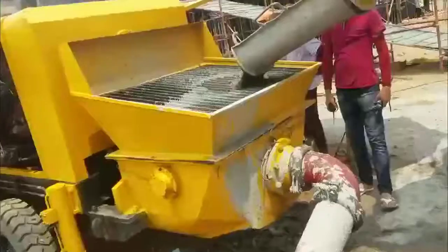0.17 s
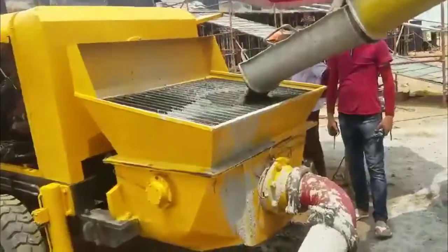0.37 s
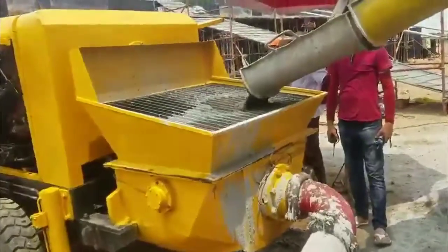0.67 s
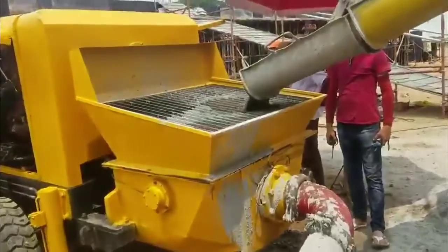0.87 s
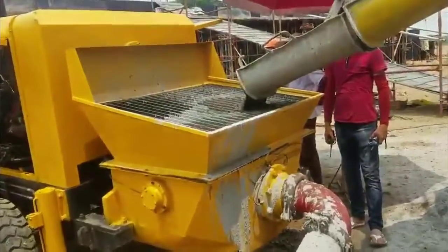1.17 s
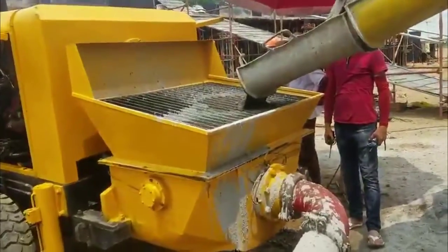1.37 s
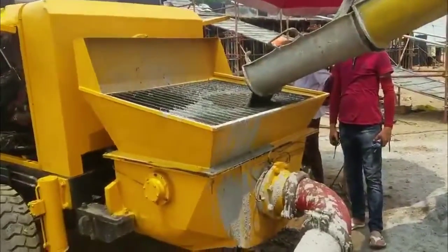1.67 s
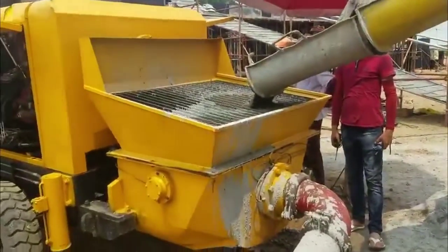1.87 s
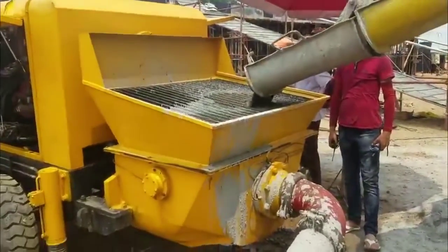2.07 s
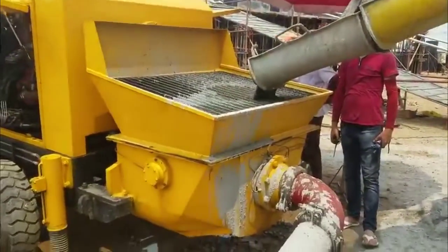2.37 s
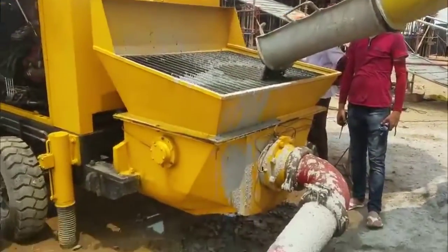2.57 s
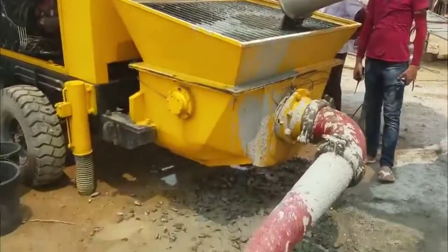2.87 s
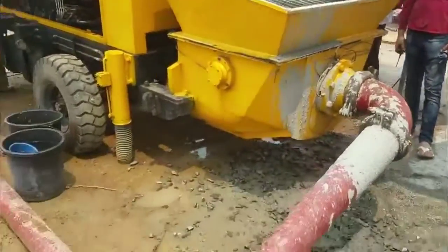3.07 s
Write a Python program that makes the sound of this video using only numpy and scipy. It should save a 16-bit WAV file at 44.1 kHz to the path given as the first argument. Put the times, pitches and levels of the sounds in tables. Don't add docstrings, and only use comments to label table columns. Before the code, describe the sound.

Loud labouring pump engine on a building site, a quick valve clatter, then faster steady droning.

```python
import sys
import numpy as np
from scipy import signal
from scipy.fft import rfft, irfft, next_fast_len
from scipy.io import wavfile

SR = 44100
rng = np.random.default_rng(int(sys.argv[2]) if len(sys.argv) > 2 else 0)


def bounce(signal):
    frames = np.transpose(np.atleast_2d(signal))
    limited = np.clip(frames, -1, 1)
    pcm = np.round(limited * 32767).astype(np.int16)
    wavfile.write(sys.argv[1], SR, pcm)


def natural_amplitude(level_db):
    exponent = np.asarray(level_db, float) / 20
    return 10 ** exponent


N = 141561
T = np.arange(N) / SR
SIZE = next_fast_len(N)
HZ = np.maximum(np.arange(SIZE // 2 + 1) * SR / SIZE, 1)
STEP = 32
HOPS = np.arange(N // STEP + 2) * STEP / SR

# time in seconds, speed in revolutions per second.
SHAFT_SPEED = [
    (.18, 28.3),
    (.4, 27.85),
    (.65, 28.0),
    (.95, 28.35),
    (1.13, 28.42),
    (1.3, 30.6),
    (1.45, 30.35),
    (1.6, 30.1),
    (2.3, 30.06),
    (3.21, 29.97),
]
# time in seconds, roar level in dB, hopper boom against the roar in dB,
# brightness in dB per octave, exhaust (low bands) in dB.
EFFORT = [(.18, -19.5, 4, 0.5, -9), (.26, -16.5, -3.5, -1, 2.5), (.36, -18.5, 1, 0.4, 0.5),
          (.6, -18, -9, .5, -0.5), (.95, -18.5, -1, 1, -3), (1.1, -15.5, -8, 0, 2.5),
          (1.2, -18, 0, -1.5, 0), (1.31, -18.5, -5, -.5, -1), (1.4, -21, -5, 0, 0),
          (1.67, -20, -8, -0.5, -3.0), (1.75, -19.5, 3.5, 0, 0.5), (2.1, -16.5, -1.5, 0.0, -5),
          (2.3, -16, -6, .5, 1.5), (2.6, -15.5, -3, -0.4, -7.5), (2.9, -17, 1.5, 0, -3.0),
          (3.21, -17.5, 0, 0.8, 2.5)]
# level in dB, start in seconds, end in seconds.
LABOURING = [(-40.5, .1, 1.2), (-36, .46, .59), (-36, .3, .98), (-40, .5, 1.1), (-34, .55, .65),
             (-35, .6, .9), (-29, .73, .88), (-44, .3, 1.1), (-37, .8, 1.13), (-40, .8, 1.13),
             (-44, .8, 1.13), (-43.5, .9, 1.13), (-44.5, .85, 1.13), (-46, .33, .83), (-46.5, .9, 1.1),
             (-45.5, .65, .86), (-31, .98, 1.07), (-45.5, .93, 1.13)]
LABOURING_ORDERS = [2, 4, 6, 9, 12, 14, 18, 36, 63, 90, 99, 108, 117, 126, 126, 135, 18, 135]
# level against the roar in dB, start in seconds, end in seconds.
PUMPING = [(-20.5, 1.2, 3.3), (-28, 1.44, 3), (-12.5, 1.6, 3.7), (-8, 1.224, 1.524), (-15.5, 1.52, 3.3),
           (-17.5, 1.28, 4.1), (-19, 2.03, 3.3), (-13, 2.1, 2.75), (-9, 1.245, 1.4), (-14.5, 1.7, 2.34),
           (-6, 2.72, 3.4), (-19, 1.54, 4.1), (-17, 2.1, 3.8), (-21, 1.7, 3.8), (-17, 2.8, 4.5),
           (-12.5, 1.7, 3.3), (-15, 1.47, 2.5), (-19, 1.6, 2.5), (-11.5, 1.71, 1.78), (-14.5, 1.3, 2),
           (-14, 2.48, 2.58), (-12, 2.4, 3), (-10.5, 2.31, 2.66)]
PUMPING_ORDERS = [2, 5, 9, 15.15, 15.15, 21, 23, 27, 30.3, 30.3, 30.3, 36, 44, 48.6, 54, 63, 72, 85.4, 90,
                  30.3, 30.3, 27, 15.15]
# time in seconds, level in dB.
KNOCKS = [
    (1.02, -24),
    (1.04, -23),
    (1.113, -16),
    (1.119, -15.5),
    (1.126, -20),
    (1.135, -24),
    (1.25, -22),
    (1.267, -18),
    (1.3, -21),
]
# pitch in Hz, level in dB, time to fall 60 dB in seconds.
VALVE_MODES = [(330, -5, .025), (520, -2, .02), (720, 1, .016), (950, 3, .014), (1200, 4, .012),
               (1500, 5, .011), (1850, 5, .01), (2250, 2, .009)]
# time in seconds, level in dB, length in seconds.
GUSTS = [
    (.55, -41, .1),
    (2.33, -35, 0.072),
    (2.46, -30, 0.027),
    (2.687, -37, 0.077),
]
# frequency in Hz, strength in dB per Hz.
ROAR_LOW = [(25, -21), (55, -16), (85, -12.5), (140, -3.5), (240, -4), (500, -2), (800, -3.5), (1300, -5.5)]
# frequency in Hz, strength in dB per Hz.
ROAR_HIGH = [(1300, -5), (1900, -2), (2600, -4.5), (3300, -11.5), (6500, -21.5), (9300, -34),
             (12800, -29.5), (15100, -31.5)]
# frequency in Hz, strength in dB per Hz.
HOPPER_COLOUR = [(255, -20), (275, 4.5), (330, 5.5), (370, 5.5), (420, -3), (700, -4), (1000, -38)]
# time of the peak in seconds, peak level in dB, pitch in Hz.
THUMPS = [(0.186, -10, 275), (0.278, -18, 266), (0.331, -13, 287), (0.408, -19, 352), (0.484, -16.5, 349),
          (0.535, -16.5, 272), (0.594, -15.5, 342.7), (0.7, -17, 259), (0.757, -13.5, 281),
          (0.833, -17, 283), (0.864, -16, 301.5), (0.92, -15.5, 312), (0.953, -19, 320), (1.019, -15, 341),
          (1.071, -14, 290), (1.149, -18.5, 316), (1.191, -17.5, 284), (1.248, -15, 363), (1.497, -17, 307),
          (1.532, -19, 332), (1.704, -15, 322), (1.774, -19.5, 311), (1.885, -12.5, 341), (1.965, -20, 275),
          (2.019, -21.5, 308), (2.119, -14, 339), (2.19, -10.5, 328), (2.264, -16, 334),
          (2.321, -10.5, 301.5), (2.383, -20, 308), (2.445, -14.5, 284), (2.506, -22, 262),
          (2.551, -10.5, 348), (2.588, -10, 315), (2.658, -11, 328), (2.736, -10.5, 278),
          (2.793, -12, 320.6), (2.837, -22, 268), (2.941, -10, 275), (3.003, -14, 319), (3.036, -15, 331),
          (3.086, -11, 317), (3.125, -11.5, 343), (3.176, -10.5, 287)]
# pitch in
# Hz, # width in Hz, level against the roar in dB, start in seconds, end in seconds.
SINGING = [(460, 30, -10, .2, .29), (2643, 20, -7, .24, 0.33), (2500, 160, -12, 0.34, 1.2),
           (2450, 110, -14.5, 2.02, 2.6), (447, 18, -4, 2.31, 2.36), (12600, 110, -30.5, 2.15, 3.08),
           (550, 280, -4, .1, 0.26), (275, 22, -4, .1, 0.2), (2560, 22, -6, 0.55, 0.59),
           (660, 19, -4.5, 2.94, 2.99), (1480, 330, -6, 2.92, 3.08)]
# frequency in Hz, left minus right in dB.
PORT_BALANCE = [(60, 7.0), (130, 3.0), (290, .5), (740, -.7), (1900, -9.5), (2900, -5.7), (5600, -6.2),
                (9000, 2.8)]
# frequency in Hz, likeness from 0 to 1.
PORT_LIKENESS = [(60, .74), (160, .87), (280, .94), (650, .85), (1200, .52), (2200, .4), (4500, .33),
                 (9000, .3)]
# frequency in Hz, lead in radians.
PORT_LEAD = [(50, -1.3), (160, -.5), (330, -.15), (1000, .6), (1830, 2.6), (2690, 6.3), (4300, 12.0),
             (16000, 47.5)]

GUST_CUT_HZ, GUST_LEFT_DB, GUST_RIGHT_DB = 86, 5.0, -6
MIXER_HZ, MIXER_DB = 110.2, -41.5
THUMP_RISE_S, THUMP_T60_S, THUMP_DB, THUMP_LEAD_S = .012, .16, -5.5, .008
KNOCK_DECAY_S = 0.0038
BOOM_FLICKER_DB = 1.5
FIRING_DEPTH, FLICKER_DB, SURGE_DB, PORT_FLICKER_DB = .06, 1.2, .25, .9
TONE_WOBBLE_DB, TONE_WOBBLE_HZ, TONE_BLUR_RAD = 1.5, 10.0, .3
TONE_EDGE_S, TONE_SPREAD_RAD = .03, .2
SHADOW_HZ, SHADOW_WIDTH_HZ, SHADOW_SHARE, SHADOW_FROM_S = 8500, 520, .87, 1.85
START_S, FADE_IN_S = 0.1796, 0.0012
CEILING = 1.06


def rms_one(x):
    return x / np.sqrt(np.mean(x ** 2) + 1e-20)


def fine(coarse):
    return np.interp(T, HOPS, coarse)


def in_time(rows):
    s, *columns = np.transpose(rows)
    return [np.interp(HOPS, s, column) for column in columns]


def at_hz(points, hz):
    table_hz, values = np.transpose(points)
    return np.interp(np.log(hz), np.log(table_hz), values)


def drift(rate_hz):
    r = np.exp(-2 * np.pi * rate_hz * STEP / SR)
    chance = rng.standard_normal(len(HOPS) + 2000)
    slow = signal.lfilter([1], [1, -2 * r, r * r], chance)[2000:]
    return rms_one(slow - slow.mean())


def gate(on, off, edge):
    swell = 1 + np.tanh((HOPS - on) / edge)
    fade = 1 + np.tanh((off - HOPS) / edge)
    return .25 * swell * fade


def air_noise(colour):
    alike = np.clip(at_hz(PORT_LIKENESS, HZ), 0, 1)
    mid, side = rfft(rng.standard_normal((2, SIZE)))
    shared = np.sqrt(1 + alike) * mid
    different = np.sqrt(1 - alike) * side * [[1], [-1]]
    return natural_amplitude(at_hz(colour, HZ)) * (shared + different)


def wind():
    shape = sum(natural_amplitude(db) * np.exp(-((T - s) / length) ** 2) for s, db, length in GUSTS)
    rumble = signal.butter(2, [28, GUST_CUT_HZ], "band", fs=SR, output="sos")
    low = signal.sosfilt(rumble, rng.standard_normal((2, N)))
    return shape * rms_one(low) * natural_amplitude(np.array([[GUST_LEFT_DB], [GUST_RIGHT_DB]]))


def mixer():
    strength = fine(natural_amplitude(MIXER_DB + 1.9 * drift(6.5)))
    return strength * np.sqrt(2) * np.sin(2 * np.pi * MIXER_HZ * T + fine(0.97 * drift(4.8)))


def thumps():
    out = np.zeros(N + SR)
    t = np.arange(SR // 5) / SR
    shape = (1 - np.exp(-t / THUMP_RISE_S)) ** 2 * natural_amplitude(-60 * t / THUMP_T60_S)
    shape = shape / shape.max()
    for (s, db, hz), start in zip(THUMPS, rng.random(len(THUMPS))):
        first = int((s - THUMP_LEAD_S) * SR)
        ring = np.sin(2 * np.pi * (hz * t + start))
        out[first:first + len(t)] += natural_amplitude(db + THUMP_DB) * shape * ring
    return out[:N]


def singing(level_db):
    out = 0
    flat = [(30, 0), (16000, 0)]
    for hz, width_hz, db, on, off in SINGING:
        resonance = 1 / (1 + ((HZ - hz) / width_hz) ** 2)
        hiss = rms_one(irfft(air_noise(flat) * resonance, SIZE)[:, :N])
        strength = natural_amplitude(level_db + db + 2.4 * drift(7.1)) * gate(on, off, 0.014)
        out = out + fine(strength) * hiss
    return out


def valve():
    burst, out = np.full(N, 1e-18), 0
    for s, db in KNOCKS:
        burst += natural_amplitude(db) * (T > s) * np.exp(-np.maximum(T - s, 0) / KNOCK_DECAY_S)
    for hz, db, t60 in VALVE_MODES:
        r, w = natural_amplitude(-60 / (t60 * SR)), 2 * np.pi * hz / SR
        strike = burst * rng.standard_normal(N)
        ring = signal.lfilter([0, np.sin(w)], [1, -2 * r * np.cos(w), r * r], strike)
        out = out + natural_amplitude(db - 18) * ring
    return out


def hopper(level_db):
    boom = rms_one(irfft(air_noise(HOPPER_COLOUR), SIZE)[:, :N])
    return fine(natural_amplitude(level_db - 7.5 + BOOM_FLICKER_DB * drift(11.4))) * boom


def roar(turns, level_db, tilt, exhaust_db):
    noise, out, surge = air_noise(ROAR_LOW + ROAR_HIGH[1:]), 0, drift(4.4)
    firing = 1 + FIRING_DEPTH * np.cos(4 * np.pi * turns)
    for k in range(-11, 9):
        share = np.cos(np.pi / 2 * np.clip(2 * np.log2(HZ / 1000) - k, -1, 1)) ** 2
        db = FLICKER_DB * drift(17.5) + SURGE_DB * surge
        db = db + tilt * max(k / 2 - 1, 0) + exhaust_db * (k < -4)
        strength = np.array([fine(natural_amplitude(db + PORT_FLICKER_DB * drift(6.0))) for port in "LR"])
        out = out + strength * irfft(noise * share, SIZE)[:, :N]
    return fine(natural_amplitude(level_db + 1.13)) * firing * rms_one(out)


def tones(orders, rows, turns, level_db):
    out = 0
    for multiple, (db, on, off) in zip(orders, rows):
        blur = fine(TONE_BLUR_RAD * drift(TONE_WOBBLE_HZ))
        phase = 2 * np.pi * (multiple * turns + rng.random()) + blur
        strength = natural_amplitude(db + level_db + TONE_WOBBLE_DB * drift(TONE_WOBBLE_HZ))
        gain = fine(strength * gate(on, off, TONE_EDGE_S))
        shift = fine(TONE_SPREAD_RAD * np.log2(2 + multiple / 9) * drift(3.05))
        out = out + gain * np.sin([phase, phase + shift])
    return np.sqrt(2) * out


def ports(left, right):
    half = natural_amplitude(at_hz(PORT_BALANCE, HZ) / 2)
    lead = np.interp(HZ, *np.transpose(PORT_LEAD))
    left_spectrum = rfft(left, SIZE) * half
    right_spectrum = rfft(right, SIZE) / half * np.exp(-1j * lead)
    return irfft(np.array([left_spectrum, right_spectrum]), SIZE)[:, :N]


def scene():
    turns = np.cumsum(fine(in_time(SHAFT_SPEED)[0])) / SR
    level_db, boom_db, tilt, exhaust_db = in_time(EFFORT)
    old_stroke = tones(LABOURING_ORDERS, LABOURING, turns, level_db=2.0)
    new_stroke = tones(PUMPING_ORDERS, PUMPING, turns, level_db)
    point = old_stroke + new_stroke + mixer() + valve() + thumps()
    wide = roar(turns, level_db, tilt, exhaust_db) + hopper(level_db + boom_db) + singing(level_db)
    return ports(*(wide + point)) + wind()


def roll_off(x):
    return signal.sosfilt(signal.butter(12, 15150, fs=SR, output="sos"), x)


def record(dry):
    shadow = np.exp(-((HZ - SHADOW_HZ) / SHADOW_WIDTH_HZ) ** 2)
    band = irfft(rfft(dry, SIZE) * shadow, SIZE)[:, :N]
    shaded = dry - SHADOW_SHARE * fine(gate(SHADOW_FROM_S, 4.0, 0.14)) * band
    rounded = shaded / (1 + (shaded / CEILING) ** 4) ** .25
    live = np.clip((T - START_S) / FADE_IN_S, 0, 1) * rounded
    return roll_off(live)


dry = scene()
out = record(dry)
bounce(out)
```